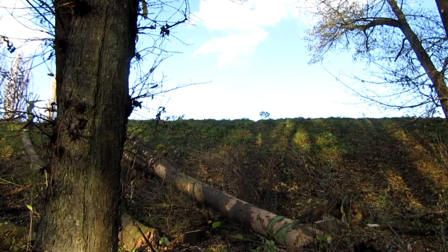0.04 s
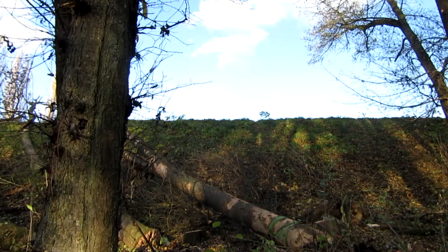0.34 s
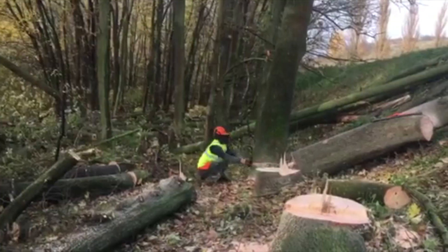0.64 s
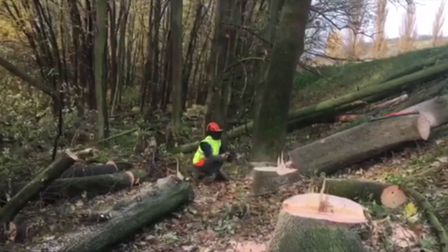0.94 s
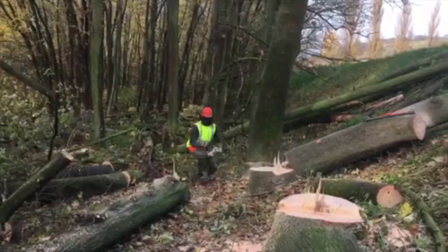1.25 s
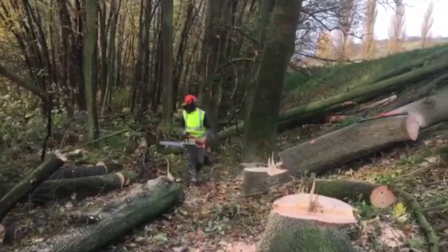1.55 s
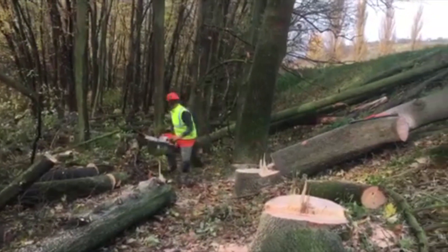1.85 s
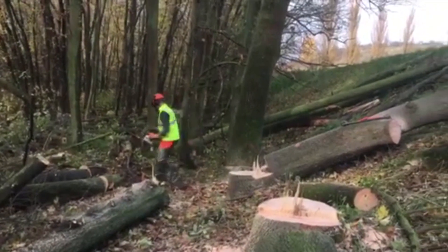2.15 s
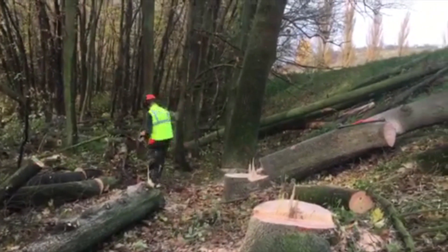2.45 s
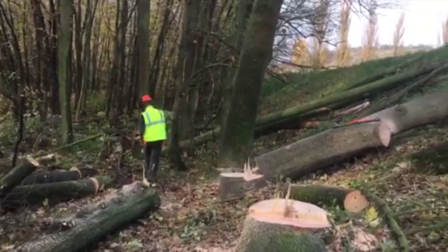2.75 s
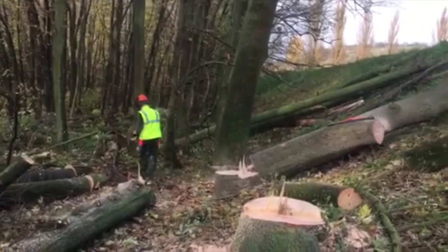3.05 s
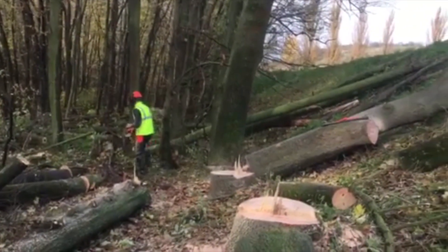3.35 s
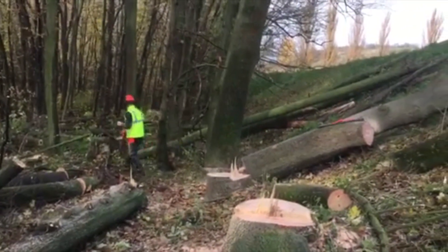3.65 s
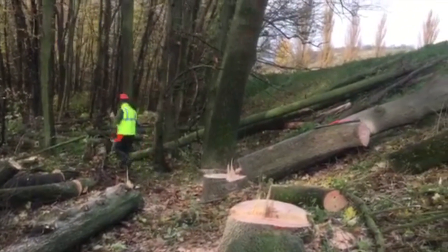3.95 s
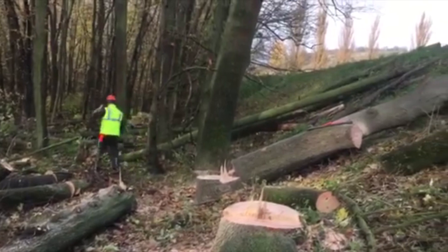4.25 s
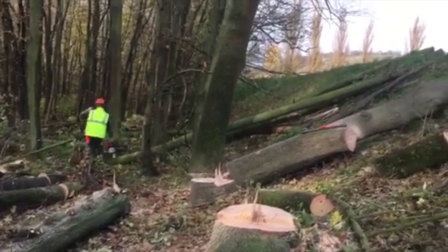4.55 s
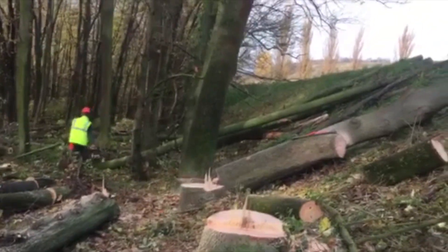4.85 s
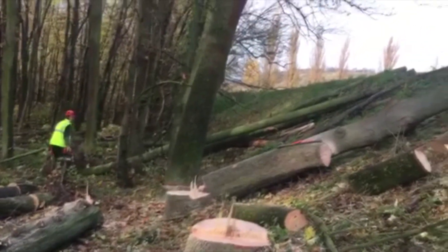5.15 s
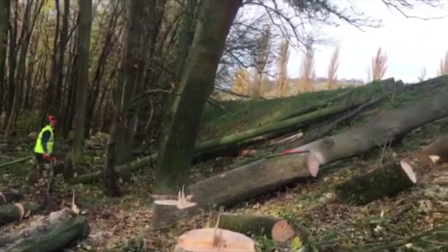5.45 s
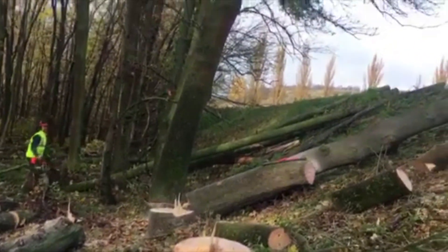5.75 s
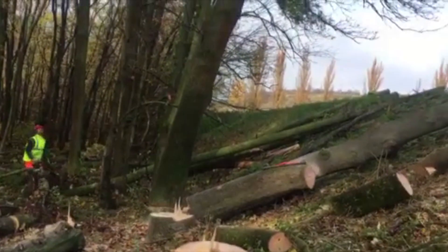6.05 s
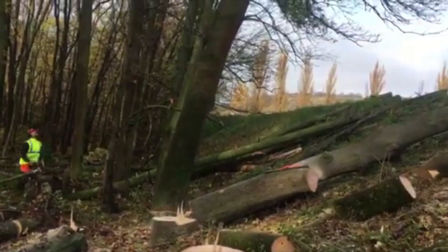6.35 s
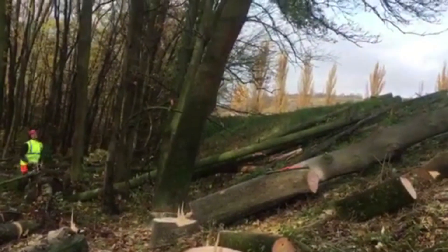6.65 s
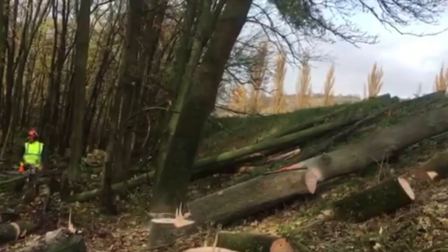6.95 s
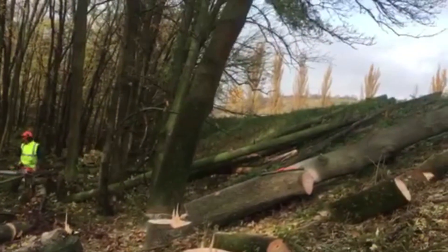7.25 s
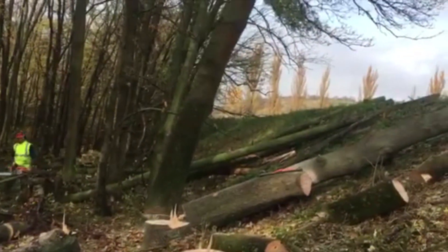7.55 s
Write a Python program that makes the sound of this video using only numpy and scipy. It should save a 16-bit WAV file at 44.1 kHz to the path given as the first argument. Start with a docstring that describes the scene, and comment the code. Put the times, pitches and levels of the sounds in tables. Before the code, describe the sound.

Dry leaves rustle softly for the first half second. At 0.5 seconds a two-stroke chainsaw cuts in at full throttle and is released almost at once. Its buzz falls in pitch and slows into hollow putts while the chain rattles. It catches at about 1.5 and 1.9 seconds, then chugs and clanks to a stop by 2.5 seconds.

A tree starts to lean. From about 2.9 seconds its wood gives faint ticks and scattered snaps, with one loud, sharp crack at 5.3 seconds. After a short lull the cracking quickens from 6.5 seconds, with strong breaks at 6.9 and 7.3 and dense splintering that is loudest at the end, near 7.7 seconds. Saw and cracks echo briefly among the trunks. Faint wind continues underneath, with low air rumble and dull bumps on the hand-held microphone, strongest around 5.6 and 7.2 seconds.

```python
"""In a wood, a tree is being felled. Dry leaves rustle; then the scene changes to a two-stroke chainsaw running
flat out, which is released: its exhaust puffs and its chain rattles with each turn of the crank as it coasts
down, catches twice and clanks to a stop. The tree starts to lean: its hinge fibres tick, crack and splinter
ever faster, and the trunks around echo. Underneath: faint wind, and air and bumps on a hand-held microphone."""
import sys
import numpy as np
from scipy import signal
from scipy.fft import rfft, irfft, next_fast_len
from scipy.io import wavfile
from scipy.ndimage import uniform_filter1d, map_coordinates

SR = 44100
rng = np.random.default_rng(int(sys.argv[2]) if len(sys.argv) > 2 else 0)


def file_out(sig):
    """Save sig as 16-bit WAV at sys.argv[1]."""
    # one column per channel
    cols = np.atleast_2d(sig).T
    # limit, then scale
    lim = np.clip(cols, -1, 1)
    pcm = np.round(lim * 32767).astype(np.int16)
    wavfile.write(sys.argv[1], SR, pcm)


N = 340011
SAW_ON, RELEASE, LAST_CATCH, STALL = 0.492, 0.551, 1.882, 2.225  # the saw's cues [s]


def amp(db):
    """Decibels to gain."""
    return 10 ** (np.asarray(db) / 20)


def unit(x):
    """Scale to rms 1."""
    return x / np.sqrt(np.mean(x ** 2) + 1e-20)


def along(points, hz):
    """Read (frequency [Hz], value) points on a log axis."""
    f, v = np.transpose(points)
    return np.interp(np.log(hz + 1), np.log(f + 1), v)


def clock():
    """Time of every sample [s]."""
    return np.arange(N) / SR


def automation(points):
    """Join (time [s], value) points into one value per sample."""
    return np.interp(clock(), *np.transpose(points))


def wobble(rate):
    """A smooth random curve, rate knots a second."""
    return map_coordinates(rng.standard_normal(int(N * rate / SR) + 4), [np.arange(N) * rate / SR])


def filtered(x, response):
    """Multiply the spectrum of x by a function of frequency."""
    size = next_fast_len(len(x) + 8192)
    return irfft(rfft(x, size) * response(np.fft.rfftfreq(size, 1 / SR)), size)[:len(x)]


def coloured(x, points, size=4096):
    """Minimum-phase EQ through (frequency [Hz], gain [dB]) points."""
    cepstrum = irfft(along(points, np.fft.rfftfreq(size, 1 / SR)) * np.log(10) / 20)
    cepstrum[1:size // 2] *= 2
    cepstrum[size // 2 + 1:] = 0
    return signal.fftconvolve(x, irfft(np.exp(rfft(cepstrum))))[:len(x)]


def resonances(modes, f):
    """Response of (frequency [Hz], width [Hz], gain [dB]) modes."""
    return sum(amp(db) * 1j * f * width / (hz * hz - f * f + 1j * f * width) for hz, width, db in modes)


def noise(points):
    """Noise of rms 1, shaped by (frequency [Hz], gain [dB]) points."""
    return unit(filtered(rng.standard_normal(N), lambda f: amp(along(points, f))))


def steady(x, size=4000):
    """Ride the running level of x to 1."""
    power = np.abs(uniform_filter1d(uniform_filter1d(x * x, size), size))
    return x / np.sqrt(power + power.max() / 10 ** 4)


def add(track, s, sound):
    """Mix a sound in at time s."""
    part = track[max(round(s * SR), 0):][:len(sound)]
    part += sound[:len(part)]


def each_turn(cycle, turns):
    """Loop a waveform once per turn of the crank."""
    return np.interp(turns % 1 * len(cycle), np.arange(len(cycle) + 1), np.r_[cycle, cycle[0]])


def wind(level_db=-52):
    """A faint, slowly drifting wash of wind in the crowns, entering with the saw."""
    # tone of the wind: (frequency [Hz], gain [dB])
    wash = [(71, -27), (120, 0.5), (291, -4.5), (348, -1.5), (482, -7.5), (705, -2.5), (2320, -19),
            (4370, -25.5), (5330, -29.5), (9000, -35.5), (11700, -47), (19800, -120)]
    return amp(level_db + 0.61 * wobble(1.15)) * noise(wash) * (clock() > SAW_ON)


def leaves(bed_db=-48):
    """Dry leaves are brushed in a few soft swishes over a faint rustle, until the scene changes to the saw."""
    # brushes through the leaves: (time [s], level [dB], half length [s])
    swishes = [(0.022, -39.5, 0.1), (0.276, -39.5, 0.044), (0.392, -44.5, 0.029)]
    # tone of dry leaves: (frequency [Hz], gain [dB])
    rustle = [(20, -39), (60, 3), (130, 4.5), (250, -3.5), (800, 2.5), (3000, -0.5), (5000, -3), (6500, -8),
              (9500, -9.5), (12000, -15), (15000, -26)]
    t = clock()
    swish_power = sum(amp(db) ** 2 * np.exp(-((t - s) / length) ** 2) for s, db, length in swishes)
    envelope = np.sqrt(amp(bed_db) ** 2 + swish_power)
    return envelope * amp(1.5 * wobble(253)) * noise(rustle) * (t < SAW_ON)


def microphone_bumps(trim_db=-3, lump_db=3.5, lump_rate=16, sag=0.33, rough=0.4):
    """Air tumbles over the microphone in uneven lumps; heavier bumps are thuds that sag in pitch."""
    # air on the microphone: (time [s], relative level [dB])
    buffet = [(.5, -38.5), (1.25, -39), (1.6, -29.5), (1.85, -32.5), (2.05, -45), (2.78, -35.5),
              (3.02, -50), (3.5, -38.5), (4, -56), (4.35, -56.5), (4.8, -41), (5, -46.5), (5.6, -38),
              (5.9, -54.5), (6.3, -41.5), (6.7, -44), (6.85, -28.5), (7.12, -40.5), (7.7, -44)]
    # tone of that air: (frequency [Hz], gain [dB])
    rumble = [(16, -59), (25, -30), (35, -3), (58, 6), (85, -0.5), (130, -8), (200, -16), (400, -52),
              (900, -83)]
    # thuds on the microphone: (time [s], level [dB], pitch [Hz], half length [s])
    bumps = [(0.467, -26.5, 189, 0.017), (1.335, -31, 108, 0.016), (2.636, -34, 72, 0.034),
             (3.424, -31.5, 67, 0.018), (3.707, -36.5, 69.5, 0.017), (4.701, -37.5, 60, 0.014),
             (5.198, -37.5, 330, 0.0052), (5.566, -36, 209, 0.0053), (5.592, -20.5, 188, 0.005),
             (5.593, -32.5, 476, 0.0032), (5.613, -23.5, 128, 0.0085), (5.627, -22, 66, 0.026),
             (6.193, -38, 68.6, 0.013), (6.308, -37, 63, 0.014), (6.814, -31.5, 140.5, 0.023),
             (6.848, -30, 102, 0.044), (7.211, -27, 68.4, 0.017), (7.251, -20.5, 68, 0.016),
             (7.479, -30, 71, 0.031)]
    lumps = amp(automation(buffet) + trim_db + lump_db * wobble(lump_rate))
    track = lumps * steady(noise(rumble), size=2000) * (clock() > SAW_ON)
    for s, db, hz, length in bumps:
        u = np.arange(-3, 3, 1 / (length * SR))  # time from the peak, in half lengths
        thud = np.sin(2 * np.pi * hz * length * (u - sag * u * u / 2))
        scuff_eq = [(hz / 4, -14), (hz, 0), (3 * hz, -7), (7 * hz, -35), (30 * hz, -100)]
        scuff = unit(coloured(rng.standard_normal(len(u)), scuff_eq))
        add(track, s - 3 * length, amp(db) * np.exp(-u * u) * (thud + rough * scuff))
    return track


def microphone(x, ceiling=0.9):
    """The microphone rounds off the sharpest peaks and dulls the highest treble."""
    # its response: (frequency [Hz], gain [dB])
    response = [(4300, 0), (4850, -3.5), (5600, 0.5), (6800, 2.5), (7300, -1.5), (7900, -2), (8400, -1.5),
                (8900, 1.5), (9500, -23.5), (12800, -30.5), (13300, -24), (15500, -57)]
    rounded = x / (1 + np.abs(x / ceiling) ** 6) ** (1 / 6)
    return coloured(rounded, response)


def forest(x, build_up_s=0.0011, early_db=9, early_s=0.0094):
    """Trunks scatter the sound back: a dense near answer and a long thin tail."""
    # reverb of the wood: (frequency [Hz], time to fall 60 dB [s])
    decay_times = [(150, 0.34), (700, 0.95), (2500, 0.7), (8000, 0.74)]
    hz, t, spectrum = signal.stft(rng.standard_normal(SR), SR, nperseg=256)
    decay = amp(-60 * t / along(decay_times, hz)[:, None])
    onset = (1 + amp(early_db) * np.exp(-t / early_s)) * (1 - np.exp(-t / build_up_s))
    tail = signal.istft(spectrum * decay * onset, SR, nperseg=256)[1]
    echo = signal.fftconvolve(x, tail / np.linalg.norm(tail))[:N]
    return coloured(echo, [(200, 2.0), (1300, 2.5), (3200, -3.5), (8000, -5.5)])


def fibres(tick_rate=500, trim_db=-2, snap_rate=7, snap_db=17):
    """Countless tiny ticks of strained wood and leaf litter; now and then a thicker fibre stands out."""
    # swell of the ticking: (time [s], relative level [dB])
    strain = [(2.5, -58.5), (3.1, -64.5), (4.7, -65), (4.95, -50.5), (5.7, -75), (6.1, -87), (6.5, -51),
              (6.7, -47.5), (6.86, -51), (6.91, -38), (7.13, -54), (7.265, -44.5), (7.3, -33),
              (7.55, -43.5), (7.655, -34.5), (7.68, -24)]
    # tone of the ticks: (frequency [Hz], gain [dB])
    crackle = [(600, -17), (1500, 15.5), (3000, 16.5), (4800, 13.5), (7000, 10), (9000, 7.5), (14000, 10.5)]
    hits = (rng.random(N) < tick_rate / SR) * amp(4 * np.minimum(rng.exponential(size=N), 3))
    hits += (rng.random(N) < snap_rate / SR) * amp(snap_db)
    decay = np.exp(-clock()[:SR // 50] / 0.002)
    ticks = signal.fftconvolve(hits, decay)[:N] * rng.standard_normal(N)
    return amp(automation(strain) + trim_db) * unit(coloured(ticks, crackle)) * (clock() > RELEASE)


def cracks(tear_s=0.0013, shreds=0.078, shred_s=0.026, ring_s=0.004, boom_db=-6, boom_s=0.02):
    """After one saw clank, fibre bundles snap: a pulse, a tear, a knock of the trunk and a dull boom."""
    # a last sharp clank of the stopping saw, then breaks in the hinge:
    # (time [s], relative level [dB], dullness [dB], share of tearing [0-1])
    hits = [(2.276, -35.5, -1.5, 0.5), (2.3925, -44, 1, 0.6), (2.866, -37, -1.5, 1), (3.445, -48, -1, 0.95),
            (3.471, -59, 1, 0.7), (3.5215, -52, 0, 0), (3.758, -47, 3.5, 0.9), (4.0345, -45, 5.5, 0.5),
            (4.4046, -36, 1, 0.74), (4.4646, -45.5, -5, 0.26), (4.6249, -49.5, 0, 0.06),
            (4.8447, -47, -1.5, 0.14), (4.894, -46, 1, 0.7), (4.9387, -45.5, 1.5, 0.7),
            (5.147, -54.5, -3, 0.1), (5.227, -40, -2.5, 1), (5.275, -46, -2, 0.2), (5.2925, -18, 1, 0.27),
            (5.6003, -43, 2.5, 0), (5.75, -54.5, -1.5, 0.9), (6.142, -53.5, -2.5, 0.7),
            (6.2132, -38, -0.5, 0.65), (6.514, -44, 1, 0.4), (6.6119, -39, -3, 0.6),
            (6.6752, -40.5, 1.5, 0.56), (6.7316, -37, -5.5, 0.46), (6.755, -41.5, -5.5, 0.96),
            (6.8445, -51, -3, 0.4), (6.852, -56, -1, 0.1), (6.8736, -33, 0, 1), (6.893, -21, -1, 0.7),
            (6.903, -45, 7, 0.8), (6.978, -46, 7, 0.7), (7.022, -45.5, 1, 0.05), (7.156, -36.5, -2, 0.19),
            (7.188, -36.5, 1.5, 0.7), (7.2112, -27.5, -1, 0.85), (7.235, -37, 3, 0.4),
            (7.2764, -22, 6, 0.9), (7.2869, -30.5, 2.5, 0), (7.293, -36.5, 9, 0.9),
            (7.3197, -28, -0.5, 0.85), (7.3547, -34.5, 1, .15), (7.402, -41, 3, 0.8),
            (7.4202, -29.5, -5, 0.4), (7.4575, -27.5, 0.5, 0.93), (7.53, -35.5, 4.5, 0.9),
            (7.591, -42, -5, 1), (7.5948, -29, 5.5, 0.43), (7.616, -37, 4, .6), (7.666, -16, 4, 1),
            (7.675, -29, -1, 0.5), (7.683, -27, 3, 0.1), (7.695, -32, 1, 0.5)]
    # modes of the trunk: (frequency [Hz], width [Hz], gain [dB])
    trunk = [(546, 90, -27), (944, 65, 3.5), (1290, 250, 11), (1610, 350, 1), (1930, 330, 3),
             (2870, 670, -0.5)]
    # boom of stem and ground: (frequency [Hz], gain [dB])
    boom_eq = [(60, -15.5), (130, 0.5), (220, -1.5), (400, -14.5), (700, -11), (1500, -34), (5000, -51)]
    track, age = np.zeros(N), clock()[:SR // 6]
    for s, snap_db, dull_db, tearing in hits:
        # the thicker the bundle, the more its sound gathers in the mids
        thickness_db = max(snap_db + 34, 0)
        body_db = snap_db - 3 + dull_db - 0.19 * thickness_db
        splinter_db = snap_db - dull_db - 0.58 * thickness_db
        grit, spikes, knock, shudder = rng.standard_normal((4, len(age)))
        tear = grit * np.exp(0.5 * spikes) * (np.exp(-age / tear_s) + shreds * np.exp(-age / shred_s))
        force = np.sqrt(tearing) * tear / np.linalg.norm(tear)
        # the pulse kicks and recoils within a quarter of a millisecond
        force[[0, 5, 11]] += np.sqrt(1 - tearing) * np.array([0.55, -0.7, 0.45])
        snap = coloured(force, [(250, body_db - 9.5), (700, body_db + 0.5), (1400, body_db + 5),
                                (2400, snap_db), (3700, snap_db - 4.5), (5400, splinter_db + 0.5),
                                (8800, splinter_db), (14000, splinter_db - 7.5)])
        snap *= np.hypot(amp(snap_db), amp(splinter_db)) / np.linalg.norm(snap)
        stretch = np.exp(0.03 * rng.standard_normal())  # each break rings a different length of wood
        knock *= np.exp(-age / ring_s) * (1 - np.exp(-age / 0.001))
        ring = filtered(knock, lambda f: resonances(trunk, f * stretch))
        ring *= amp(body_db) / np.linalg.norm(ring)
        boom = coloured(shudder * age * np.exp(-age / boom_s), boom_eq)
        boom *= amp(body_db + boom_db) / np.linalg.norm(boom)
        add(track, s, np.sqrt(SR * 0.008) * (snap + ring + boom))  # energy of 8 ms at these levels
    return track


def whine(turns, speed, rough_db=7.5):
    """The sprocket's overtones sing out as they fall through a resonance of the bar."""
    # overtones: (multiple of crank speed, resonance [Hz], half width [Hz], level [dB])
    overtones = [(14, 1620, 130, -36), (20.8, 2560, 170, -32)]
    track = np.zeros(N)
    for multiple, hz, width, db in overtones:
        level = amp(db + rough_db * wobble(70.6)) / (1 + ((multiple * speed - hz) / width) ** 2)
        track += level * np.sin(2 * np.pi * np.round(multiple) * turns + 0.5 * wobble(60))
    return track


def meshing(turns, speed, size=4096, harmonics=160):
    """Links strike the sprocket alike in every turn: a comb of lines, as loud per Hz as unit noise."""
    phases = np.exp(2j * np.pi * rng.random(harmonics))
    cycle = unit(irfft(np.r_[0, phases], size))
    return np.sqrt(2 * harmonics * speed / SR) * each_turn(cycle, turns)


def swung(x, depth_db=2.1, size=512):
    """As the saw is swung about, ever different pitches of its rattle point at the listener."""
    spectrum = signal.stft(x, nperseg=size)[2]
    drift = uniform_filter1d(rng.standard_normal(spectrum.shape), 3, axis=0)
    drift = unit(uniform_filter1d(drift, 12, axis=1))
    return signal.istft(spectrum * amp(depth_db * drift), nperseg=size)[1][:N]


def clatter(turns, speed, slow_db=7, fast_db=-1.5, swell_db=2.5, swell_rate=16, slap_db=0.7, slap_rate=90):
    """Chain and clutch snarl in step with the crank, loosen as they slow and set the casing buzzing."""
    # the chain runs evenly only at middle speeds: (crank speed [turns/s], tautness [0-1])
    tautness = [(42, 0), (64, 1), (112, 1), (150, .4)]
    # rattle that is alike in every turn: (frequency [Hz], share of power [0-1])
    repeating = [(900, .8), (1500, .55), (2700, .4), (4300, .25), (8000, .1)]
    # tone of chain and engine: (frequency [Hz], gain [dB])
    clatter_eq = [(200, -52), (450, -3), (700, 3), (920, 2.5), (1180, 7), (1900, 7), (2900, 3), (4100, 2.5),
                  (4900, -1), (6800, -8.5), (7600, -10.5), (8900, -7), (12500, -10), (16000, -18.5)]
    # casing parts, each buzzing hardest at its own crank speed:
    # (frequency [Hz], width [Hz], relative level [dB], crank speed [turns/s], spread [log speed ratio])
    casing = [(1112, 160, -8.5, 60, 0.34), (1506, 120, -7.5, 111, 0.21), (2133, 140, -6.5, 48, 0.38),
              (2200, 55, -11.5, 110, 0.18), (2440, 120, -6, 115.4, 0.094), (2590, 30, -17, 150, 0.13),
              (2990, 26, -15.5, 41, 0.57), (3180, 190, -9.5, 64, 0.44), (3600, 270, -13, 60, 0.093),
              (4070, 62, -9.5, 107, 0.22), (5370, 660, -13.5, 27, 0.33)]
    taut = np.interp(speed, *np.transpose(tautness))
    snarl = filtered(meshing(turns, speed), lambda f: np.sqrt(along(repeating, f)))
    snarl += filtered(rng.standard_normal(N), lambda f: np.sqrt(1 - along(repeating, f)))
    rattle = np.sqrt(taut) * snarl + np.sqrt(1 - taut) * rng.standard_normal(N)
    rattle *= amp(slap_db * wobble(slap_rate))  # the loose chain slaps unevenly
    # at low speed the rattle gathers into one burst per stroke
    slow = np.clip((85 - speed) / 45, 0, 1)
    stroke = np.exp(-(((turns + 0.38) % 1 - 0.5) / 0.11) ** 2 / 2)
    rattle *= steady(amp((fast_db + slow * (slow_db - fast_db)) * stroke))
    track = steady(swung(filtered(rattle, lambda f: amp(along(clatter_eq, f)))))
    for hz, width, db, best_speed, spread in casing:
        drive = np.exp(-(np.log(speed / best_speed) / spread) ** 2 / 2)
        ring = steady(filtered(rattle, lambda f: 1j * resonances([(hz, width, 0)], f)), size=8000)
        track += amp(db + swell_db * wobble(swell_rate)) * drive * ring
    return track


def exhaust_buzz(turns, sweep_turns=0.654, sweep_harmonics=4.78, uneven_db=1.5, size=1024):
    """The piston shapes every puff alike, so it stretches as the crank slows; highs leave before lows."""
    # one puff: (multiple of crank speed, gain [dB])
    puff_tone = [(1, 8), (2, 4), (3, -1.5), (4, 1), (5, 5), (6, -1), (7, 2.5), (8, 3.5), (10, -2), (14, 1),
                 (20, -6), (32, -38)]
    # the muffler while coasting: (frequency [Hz], gain [dB])
    muffler = [(40, -14), (90, -8.5), (150, -4), (270, 5.5), (370, 3.5), (700, -0.5), (880, -3), (1100, -5),
               (1600, -4.5), (2400, -2), (4000, -33)]
    harmonics = np.arange(1, 33)
    delay = sweep_turns * np.exp(-harmonics / sweep_harmonics)
    spectrum = amp(along(puff_tone, harmonics)) * np.exp(-2j * np.pi * np.cumsum(delay))
    puffs = each_turn(irfft(np.r_[0, spectrum], size), turns)
    return steady(coloured(puffs * amp(uneven_db * wobble(60.1)), muffler))


def exhaust(turns, speed, putt_hz=172, putt_s=0.0057, putt_db=4, sag=1.614, sag_s=0.004,
            port_lag_s=0.00448, rush_db=-7, thump_hz=142, thump_db=-6):
    """Pumped air: a falling buzz at speed; near rest, hollow putts with a thump and a rush of gas."""
    # escaping gas: (frequency [Hz], gain [dB])
    gas = [(60, -15), (130, 9), (400, 13.5), (700, 15.5), (950, -42), (2500, -38)]
    strokes = np.diff(np.floor(turns), prepend=np.floor(turns[0])) * amp(1.2 * wobble(30))
    # the port opens a little after each stroke and the muffler rings, sagging in pitch
    age = np.maximum(clock()[:SR // 20] - port_lag_s, 0)
    cycles = np.cumsum(putt_hz * (1 + sag * np.exp(-age / sag_s))) / SR
    swell = (age / putt_s) ** 2 * np.exp(-np.sqrt(2) * age / putt_s)
    putt = swell * (np.sin(2 * np.pi * cycles) + amp(thump_db) * np.sin(2 * np.pi * thump_hz * age))
    putts = steady(signal.fftconvolve(strokes, putt)[:N])
    rush = steady(signal.fftconvolve(strokes, swell ** 2)[:N] * noise(gas))
    slow = np.clip((65 - speed) / 13, 0, 1)
    blend = (1 - slow) * exhaust_buzz(turns) + slow * (putts + amp(rush_db) * rush)
    return steady(blend) * amp(putt_db * slow)


def pops(decay_s=0.0033):
    """Stray firings and clanks: short bursts of noise, each through one resonance."""
    # firings and clanks: (time [s], peak [dB], pitch [Hz], width [Hz])
    hits = [(0.858, -15, 2500, 810), (0.905, -17, 1560, 160), (1.49, -14, 630, 260),
            (1.488, -11, 2980, 2200), (1.657, -28, 2280, 260), (1.706, -23, 2180, 300),
            (1.85, -17, 2170, 200), (1.884, -16, 3370, 3000), (1.889, -20, 730, 704),
            (1.932, -18.5, 2100, 320), (2.129, -23, 2200, 890), (2.167, -22, 2000, 2200),
            (2.208, -23.5, 1990, 1510), (2.243, -28.5, 2980, 3000), (2.353, -49, 1690, 900),
            (2.384, -38, 1800, 400), (2.459, -37, 1804, 400)]
    track, age = np.zeros(N), clock()[:SR // 10]
    for s, db, hz, width in hits:
        burst = rng.standard_normal(len(age)) * np.exp(-age / decay_s)
        pop = filtered(burst, lambda f: resonances([(hz, width, 0)], f))
        add(track, s, amp(db) * pop / np.abs(pop).max())
    return track


def chugs(half_length_s=0.0053, sag=0.34):
    """The last strokes each push out one hollow gulp of air that falls in pitch."""
    # the piston rocks to rest: (time [s], peak [dB], pitch [Hz])
    strokes = [(2.222, -32.5, 190), (2.292, -26.5, 169), (2.355, -33, 164), (2.423, -33, 126),
               (2.497, -35, 140)]
    track, u = np.zeros(N), np.arange(-3, 3, 1 / (half_length_s * SR))
    for s, db, hz in strokes:
        gulp = np.exp(-u * u) * np.sin(2 * np.pi * hz * half_length_s * (u - sag * u * u / 2))
        add(track, s - 3 * half_length_s, amp(db) * gulp)
    return track


def coasting_saw(tuned_speed=111, loose_speed=80.5):
    """Each turn of the crank puffs through the muffler and shakes the chain; both fade after the stall."""
    # the crank coasts down, catches twice and rocks to rest: (time [s], speed [turns/s])
    crank = [(.551, 175), (.614, 153), (.67, 139.5), (.744, 121.5), (.858, 103.6), (1.038, 85),
             (1.306, 59.4), (1.488, 47.5), (1.49, 53.1), (1.881, 27.1), (1.882, 44.3), (2.17, 25.6),
             (2.215, 19), (2.23, 14.2), (2.43, 14.5), (2.55, 11)]
    t, speed = clock(), automation(crank)
    turns = np.cumsum(speed) / SR
    turns -= np.interp(LAST_CATCH, t, turns)  # the last catch falls on a stroke
    stalled_s = np.maximum(t - STALL, 0)
    # 6 dB down per octave: the exhaust either side of the muffler's tuning, the chain below loose_speed
    exhaust_db = -28.5 - 6 * np.abs(np.log2(speed / tuned_speed)) - 38 * stalled_s
    clatter_db = -27.5 - 6 * np.maximum(np.log2(loose_speed / speed), 0) - 54 * stalled_s
    saw = amp(exhaust_db) * exhaust(turns, speed) + amp(clatter_db) * clatter(turns, speed)
    saw += whine(turns, speed)
    fade_out = np.interp(t, [2.5, 2.65], [1, 0])
    return fade_out * saw + pops() + chugs()


def full_throttle(firing_hz=175, level_db=-18.5, limp=0.2, firing_at_s=0.4972, rasp_s=0.0014):
    """Firings bark while the throttle is open, strong and weak in turn, each with a rasp of hot gas."""
    # the exhaust under power: (frequency [Hz], gain [dB])
    bark_eq = [(100, -40), (175, 17), (350, 3), (525, -1), (700, 3.5), (875, 4), (1050, 5), (1230, -0.5),
               (1500, -2), (2000, 2.5), (2500, -17), (3200, -26), (5000, -19.5)]
    t = clock()
    turn = np.floor((t - firing_at_s) * firing_hz)
    firings = np.diff(turn, prepend=turn[0]) * amp(0.42 * wobble(169)) * (1 + limp * np.cos(np.pi * turn))
    burst = np.exp(-t[:SR // 100] / rasp_s)
    gas = noise([(300, -35), (1100, -5), (5000, 3)])
    rasp = gas * signal.fftconvolve(firings, burst / np.linalg.norm(burst))[:N]
    throttle = np.exp(-np.maximum(t - RELEASE, 0) / 0.0025)
    return amp(level_db) * throttle * steady(coloured(firings + 0.7 * rasp, bark_eq))


def scene(saw_send_db=-19, bark_send_db=-7, crack_send_db=-8.5, paths=3):
    """Saw and tree sound among the trunks; the scene changes to the saw, already running, with the forest
    already ringing."""
    bark, saw, cracking = full_throttle(), coasting_saw(), cracks() + fibres()
    engine = bark + saw + forest(amp(bark_send_db) * bark + amp(saw_send_db) * saw)
    engine *= np.clip((clock() - SAW_ON) / 0.0011, 0, 1)
    # the cracking takes another path through the trees every tenth of a second
    path = np.floor(clock() * 10) % paths
    echo = amp(crack_send_db) * sum(forest(cracking * (path == k)) for k in range(paths))
    return (microphone(engine + cracking + echo + wind()) + microphone_bumps() + leaves())[None]


def record(dry, top_hz=15500):
    """A brick-wall low-pass takes off the very top."""
    return filtered(dry[0], lambda hz: hz < top_hz)[None]


dry = scene()
out = record(dry)
file_out(out)
```